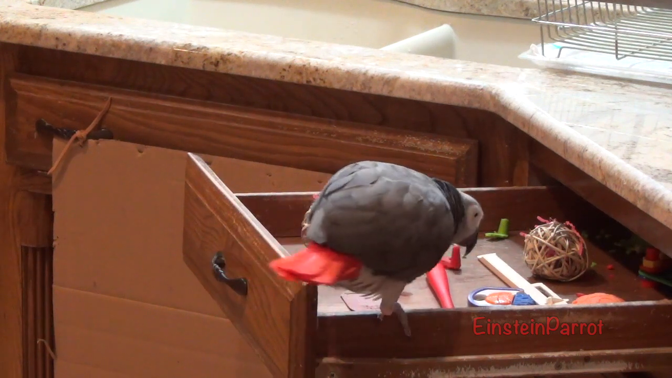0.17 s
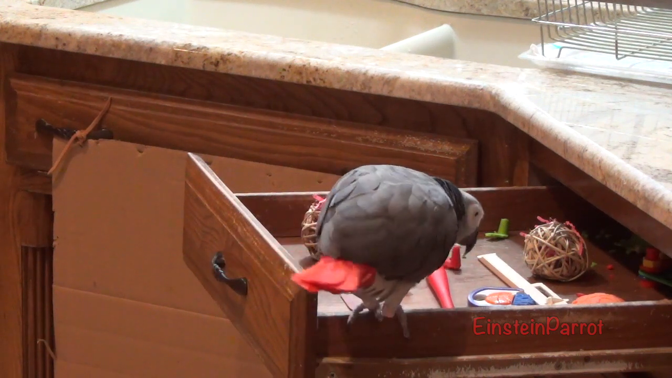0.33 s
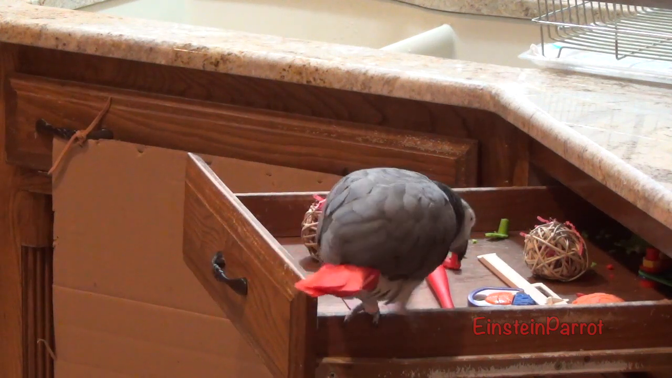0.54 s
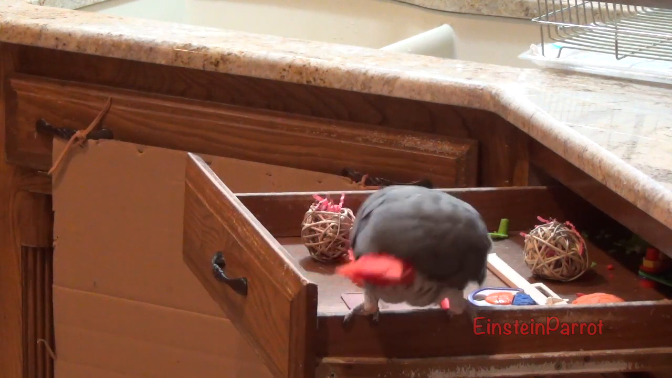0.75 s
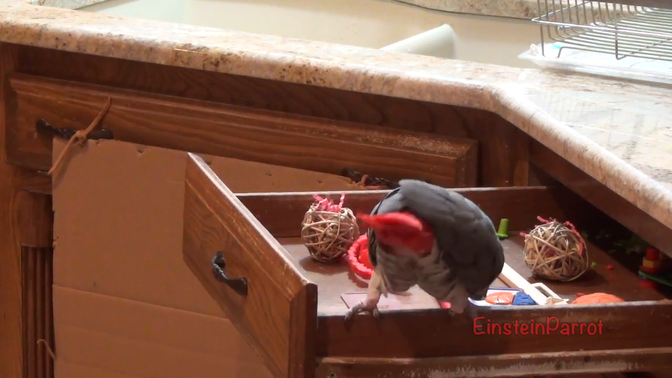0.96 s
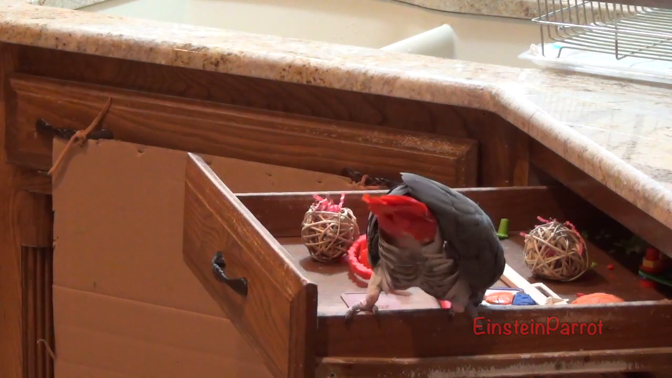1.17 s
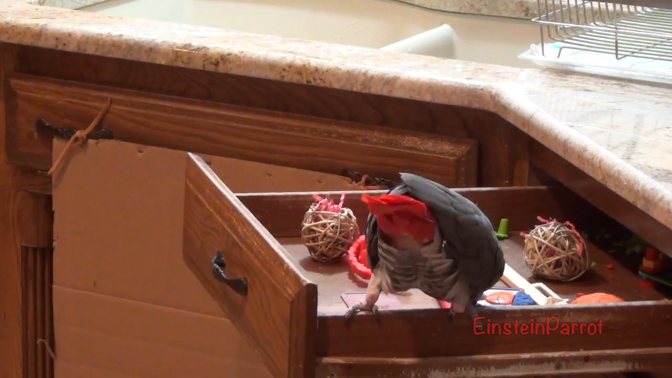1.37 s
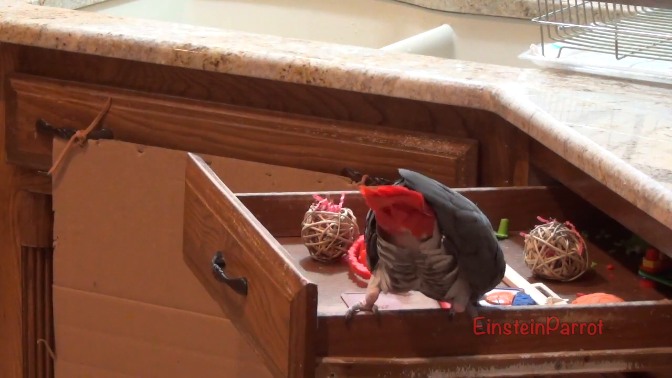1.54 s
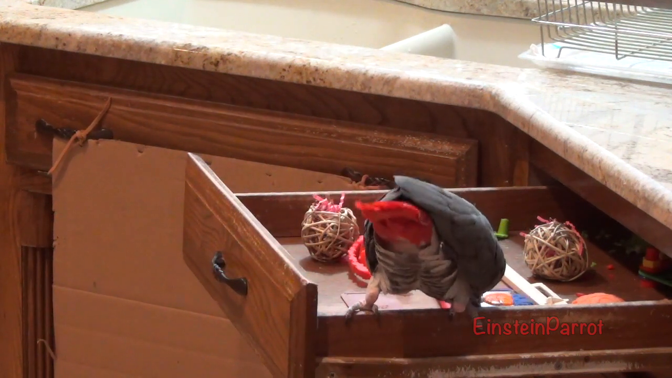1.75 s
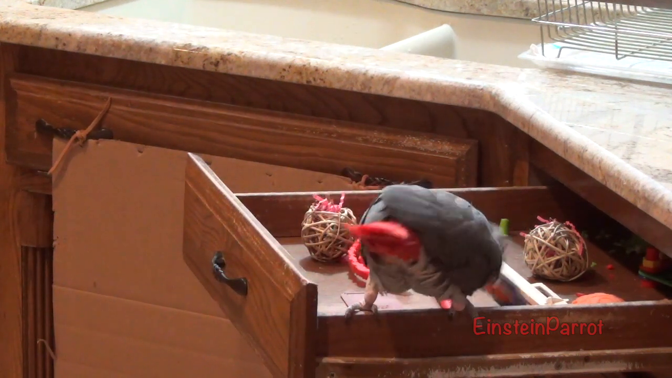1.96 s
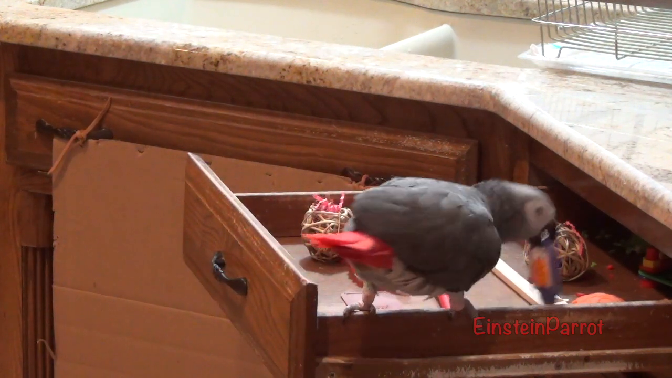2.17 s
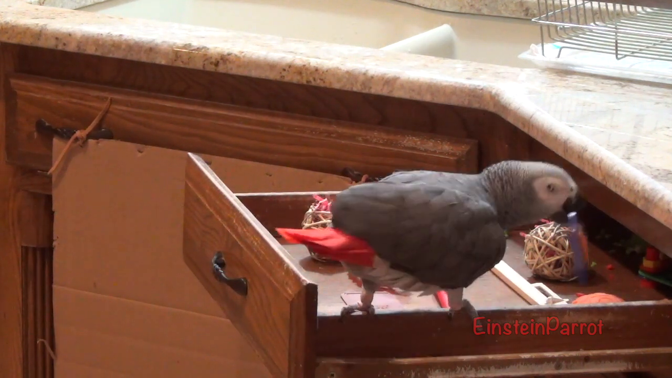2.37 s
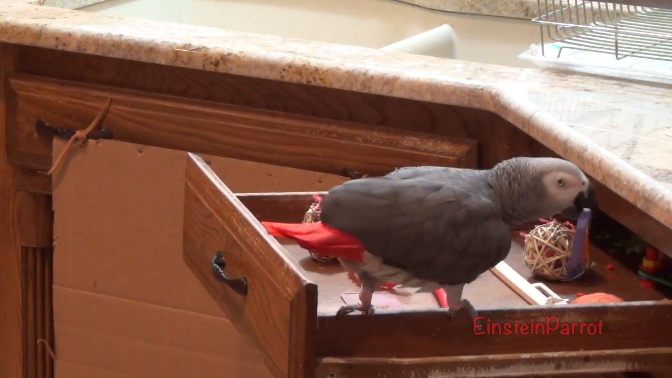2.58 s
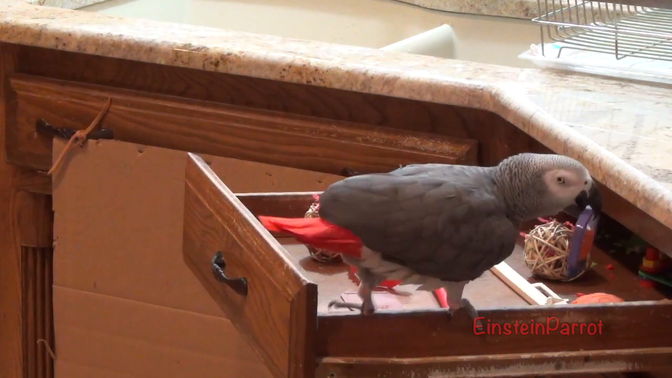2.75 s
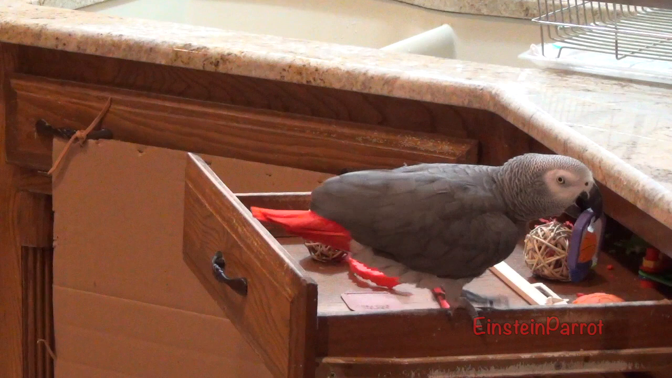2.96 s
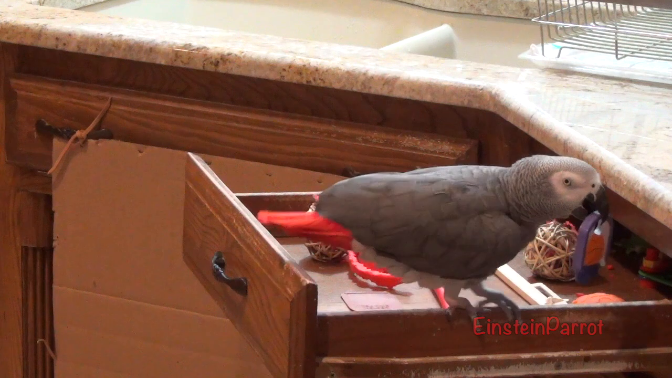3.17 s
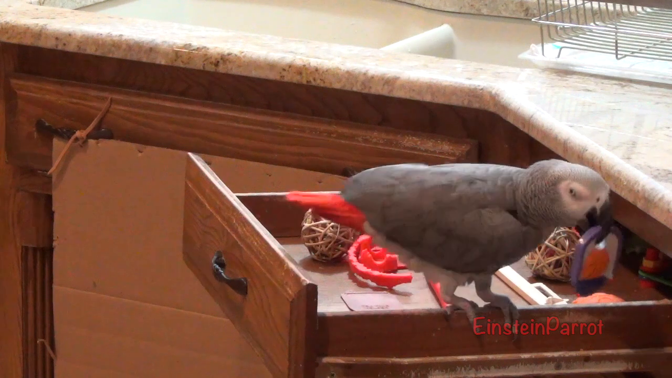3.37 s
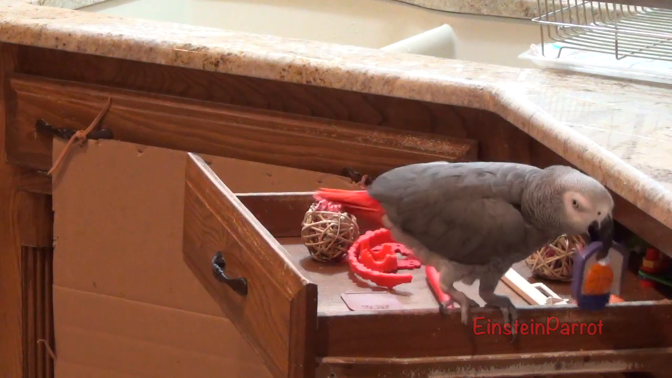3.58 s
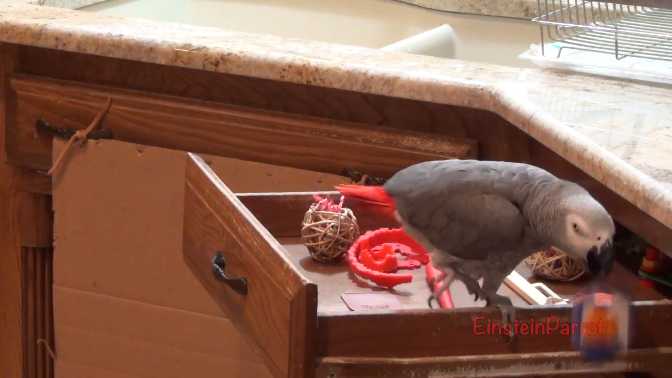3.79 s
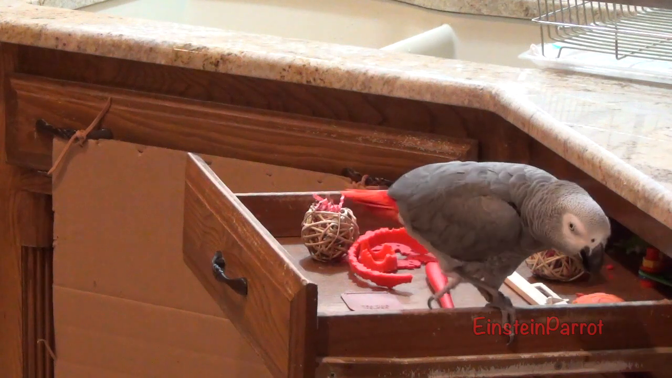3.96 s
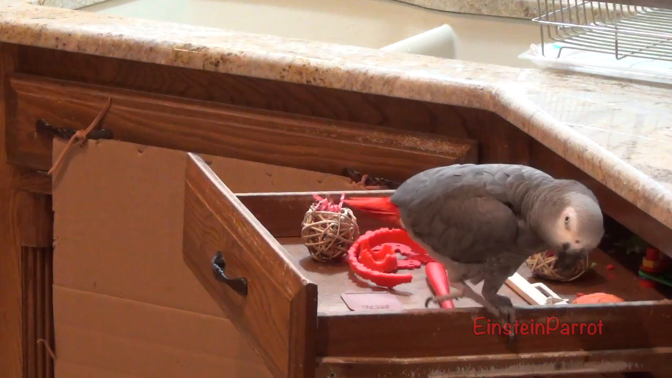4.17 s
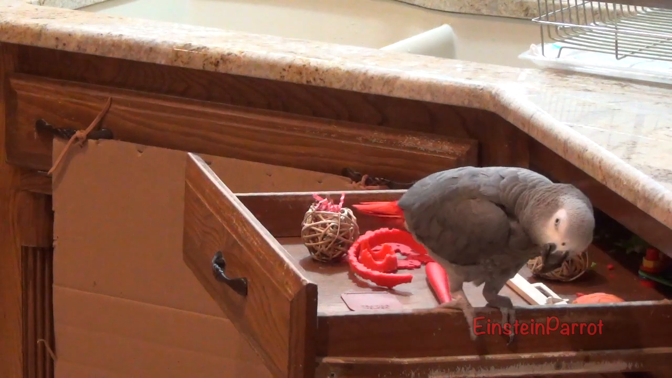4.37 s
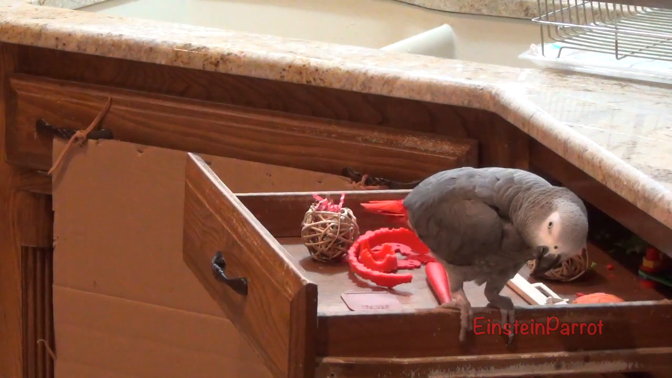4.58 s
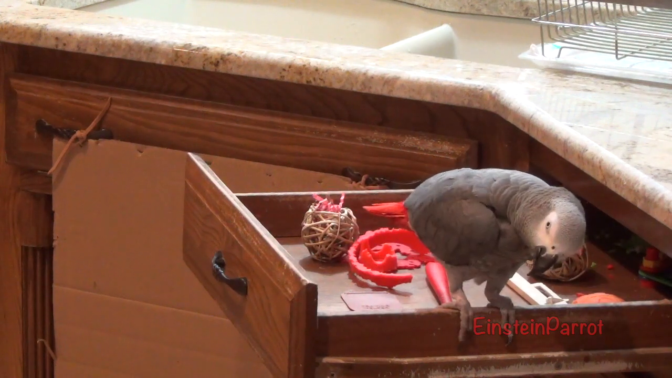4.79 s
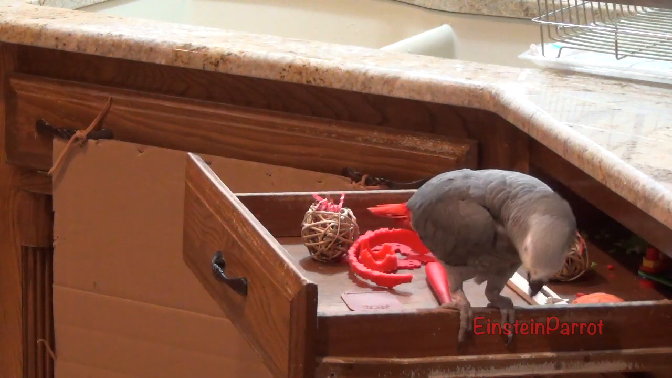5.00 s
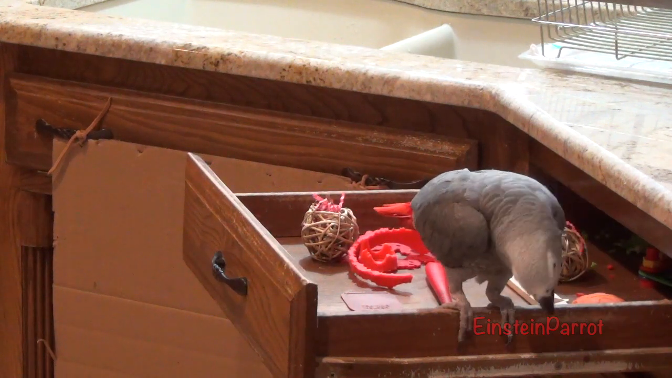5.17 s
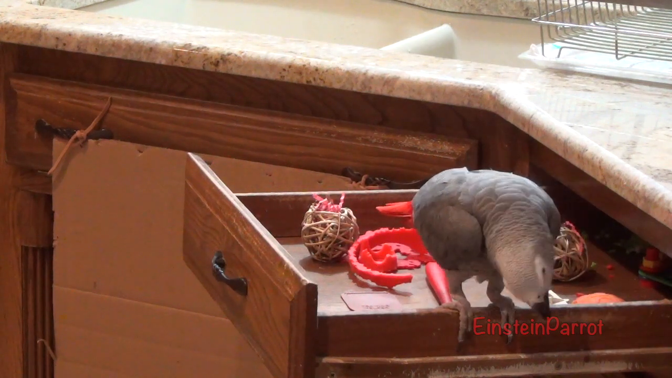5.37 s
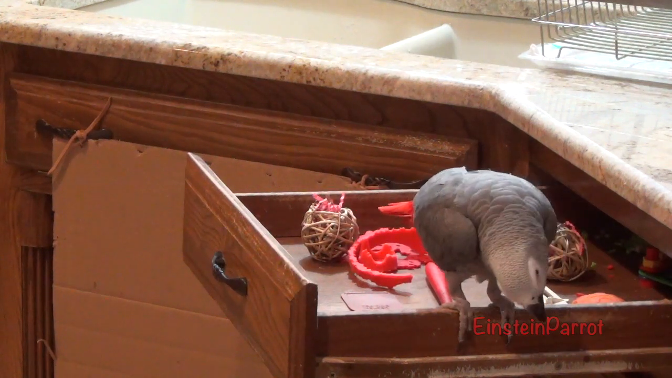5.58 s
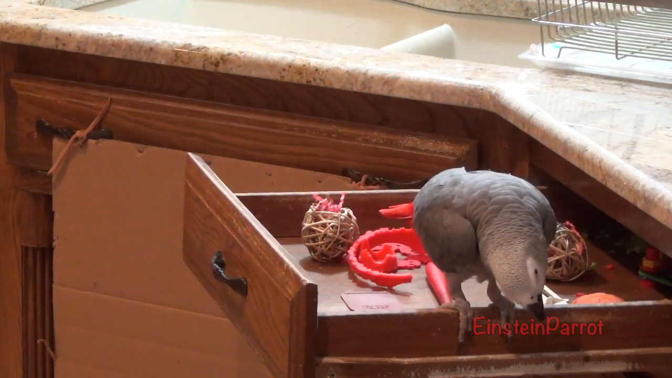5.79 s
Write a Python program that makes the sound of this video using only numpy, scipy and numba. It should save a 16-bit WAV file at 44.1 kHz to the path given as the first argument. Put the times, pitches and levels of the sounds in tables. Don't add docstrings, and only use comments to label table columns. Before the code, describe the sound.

A parrot handles hard toys in an open wooden drawer. Over soft fridge hum and airy ventilation come tiny beak and claw clicks, faint feather rustle, several dull woody knocks and a short scrape. After a quiet pause and a crisp beak click, a plastic toy hits the floor tiles, bouncing and rattling very loudly before settling. The small camera microphone is nearby in a hard, echoing kitchen and squeezes the loudest hits.

```python
import sys
import numpy as np
from scipy import signal
from scipy.fft import rfft, irfft
from scipy.io import wavfile
from numba import njit

SR = 44100
rng = np.random.default_rng(int(sys.argv[2]) if len(sys.argv) > 2 else 0)


def attenuation_scalar(level_db):
    decades = np.asarray(level_db, float) / 20
    return 10 ** decades


def store_pcm(level_fs):
    pcm = np.round(np.clip(level_fs, -1, 1) * 32767).astype(np.int16)
    wavfile.write(sys.argv[1], SR, np.atleast_2d(pcm).T)


N = 257544
T = np.arange(N) / SR

# time in seconds, peak in dB, softness, face share and room share in dB.
CLICKS = [(0.0144, -52.5, 4, 4.5, 3), (0.1605, -47, 1.5, -3.5, 1), (0.18, -45, 1, 2.0, -2.5),
          (0.5085, -34, -2, 7, -17.0), (0.5125, -26, -4, 2.5, -3.0), (0.7175, -38.0, -0.5, 5, -4.5),
          (1.949, -44, 2.0, -2, 3.5), (1.993, -49, 11.0, -9.0, -1), (2.047, -46, -9, -1, 2.0),
          (2.52, -57.5, 3, -5, 5), (2.66, -57.5, 1.0, 7.5, 5), (2.746, -48.5, 1, 4.5, 0.5)]
FIRST_BITE = [
    (3.2485, -32.5, 0, 0.5, -2),
]
LAST_BITE = [
    (3.5564, -22.5, 0, 0, 0),
]
KNOCKS = [
    (1.195, -30, -10, -4, -4.5),
    (1.433, -29.5, -5, 4, -8),
    (1.582, -34.5, 8, -2, -7),
    (1.603, -29.5, 4, -2.5, -7.5),
    (1.687, -27, -1.5, 6.5, -4.5),
]
# start in seconds, level in dB, hold in seconds.
DRAG = [
    (1.72, -42.5, 0.086),
    (1.84, -51.5, .012),
]
BOUNCES = [
    (4.1925, -32, 12, 10, -15.0),
    (4.1988, -11, -4.5, -8, 9.5),
    (4.2582, -6, 0.0, -7, 2.5),
    (4.4998, 1.5, -4, 4, 4.5),
    (4.6309, -9.0, -3, 5, -1.5),
    (4.6611, -11.5, 1.5, 2.5, 3.0),
    (4.7498, -13, 3.5, -8.5, 0.5),
]
SNAPS = [(4.3324, -10, -1, -8, -22.0), (4.4432, -11.5, 5, 0, -21), (4.479, -12, -5, 2, -6.5),
         (4.4836, -11, 0.5, -1, 3.5), (4.5104, 0.5, 11, -1, -13.5), (4.5354, 2, 4, 2, -19),
         (4.6204, -4.5, -3.5, 1, -12), (4.6254, -4, 8.5, -4.0, -13.0), (4.7204, -12, -2.5, -8, -15.5),
         (4.7615, -6.5, -3.5, 0, -20), (4.793, -8.5, -1.5, 9, -5), (5.048, -15.5, -0.5, 11, -3.5)]
ROCKS = [
    (3.645, -37, 8, -2.5, -4),
    (4.4454, -7.5, 1, -7.0, -3),
    (4.8178, -3.5, -5, -6, 1.5),
    (4.9379, -5, -4, -2.5, -1),
    (4.9551, -5.5, -2, -4, 0.0),
    (4.9722, -14.5, -12, 17, -19),
    (5.0607, -6.5, -6.5, 1, 3),
    (5.445, -42.0, 2.5, 4, -5.5),
    (5.7005, -47, 6, -2.5, 2.5),
    (5.8235, -31.5, -1, 5.0, -1),
]
# start in seconds, level in dB, hold in seconds, face share in dB.
RATTLE = [
    (4.209, -7, 0.011, 3.5),
    (4.235, -20.5, .03, 7),
    (4.512, -16.5, .055, -5),
    (4.62, -36, .09, -4.5),
]
# time in seconds, peak in dB, length in
# milliseconds.
THUMPS = [
    (4.263, -40, 1.2),
    (4.501, -25.5, 0.66),
]
# start in seconds, level in dB, hold in seconds.
RUSTLE = [(.02, -58, 0.013), (.178, -59, 0.0076), (.42, -67.5, 0.022), (.6, -51, 0.053), (.76, -61, .01),
          (1.005, -65, .01), (1.62, -64, .06), (1.71, -49.5, 0.2), (2.058, -55.5, 0.007), (2.2, -72, 0.081),
          (2.544, -67, .02), (2.752, -56, .01), (3.088, -61, 0.27), (3.77, -57.5, 0.075)]

# frequency in Hz, width in Hz, level in dB.
SMALL_TOYS = [(1600, 490, -6.5), (2350, 590, -6.5), (3500, 1000, -5), (4800, 1100, -6), (5870, 560, -2),
              (6240, 110, -5.5), (6830, 690, -2.5), (7900, 1000, 1.5), (9200, 1200, -2.5), (10550, 990, -6)]
FIRST_GRIP = [(1280, 280, -1.5), (2300, 780, 1.5), (3080, 710, -1.5), (3680, 270, -3.5), (4700, 610, 5),
              (5900, 560, 0.5), (6900, 240, -2), (7540, 500, 0), (8300, 420, 1), (9300, 500, -3),
              (10500, 720, 3.5)]
SECOND_GRIP = [(1640, 760, -8), (2300, 1500, 0.5), (4150, 750, 0.5), (4750, 350, -2), (5670, 300, -11),
               (6180, 360, -3.5), (6820, 440, -5.5), (7960, 1300, -1), (8900, 750, -2.5),
               (10600, 1400, -1.5)]
BOTTOM_NEAR = [(181, 100, 1.5), (398, 190, 7), (510, 320, 2.5), (844, 150, 2), (1040, 330, 0),
               (1380, 480, -3.5), (1810, 730, -13), (2070, 180, -4.5), (2260, 280, -6.5), (2720, 240, -4),
               (2980, 440, -3.5), (4180, 900, -4), (5870, 3000, 6)]
BOTTOM_FAR = [(168, 61, -7), (333, 56, 6), (480, 110, -0.5), (827, 230, 1), (964, 240, 3.5),
              (1380, 600, -1.5), (1790, 500, -12), (2060, 190, -1), (2300, 220, -3.5), (2650, 250, 0),
              (2950, 400, -2.5), (4050, 3100, -3), (5900, 4100, 5)]
WOOD = [(174, 60, -7.5), (336, 99, 1.5), (432, 36, -2.5), (508, 61, -0.5), (626, 160, -0.5), (820, 190, -2),
        (1030, 150, -5.5), (1430, 560, -5.5), (2000, 300, -6), (2370, 150, -6), (2660, 170, -4.5),
        (3020, 650, -8), (3940, 720, -11), (6040, 2700, 5.5)]
PLASTIC = [(415, 380, -26), (970, 630, -12), (1650, 510, -4.5), (2420, 510, -2.5), (3410, 1130, -4),
           (3970, 1500, -1.5), (4470, 710, -3.5), (5500, 1300, -0.5), (6020, 290, -1.5), (6540, 560, 0),
           (7260, 300, -0.5), (7250, 3000, 4.5), (9250, 1400, -5), (10390, 1350, -3)]
TOY_ON_EDGE = [(1103, 860, -12.5), (1674, 400, -2.5), (2473, 540, -1), (3640, 370, 1), (3994, 130, 0.5),
               (4320, 310, -1), (5390, 670, -4.5), (5980, 1300, -1), (6590, 580, -3.5), (7600, 510, 2.5),
               (8680, 680, -3), (9280, 290, -4.5), (10320, 2000, -3)]
RACK = [(1660, 95, -46), (2520, 150, -58.5), (4080, 150, -46), (5270, 89, -50.5)]
FRIDGE = [(121.7, 13.5, -62.5), (65, 22, -65.5), (842, 120, -65.5), (1170, 61, -72), (1533, 62, -76.5),
          (1016, 140, -74), (6290, 1700, -72.5)]

# frequency in Hz, seconds to fall 60 dB, echo level in dB, side minus mid in dB.
KITCHEN = [(254, 0.57, -25, -12.5), (512, 0.47, -23.5, -13), (997, 0.52, -25, -11.5),
           (1760, 0.62, -27, -16.5), (2450, 0.5, -25, -32), (4000, 0.53, -25.5, -45),
           (6620, 0.42, -29.5, -41.5), (10160, 0.35, -28, -13.5)]
# frequency in Hz, level in dB.
AIR = [(15, -68), (25, -29), (114, -3.5), (440, -10), (1330, -20), (10600, -27.5), (11500, -31.5),
       (15000, -73)]
# frequency in Hz, side minus mid in dB.
AIR_SIDE = [(60, -22), (110, -12.5), (350, -16.5), (630, -9.5), (1120, 0), (2020, -15.5), (3630, -26),
            (11700, -6)]

PLASTIC_EDGES = (3000, 5000, 7200)
WOOD_EDGES = (600, 1600, 4500)
PLASTIC_SOFT = (1, .4, 0, -.8)
WOOD_SOFT = (0, 0, -.6, -1)
PLASTIC_FACE, WOOD_FACE = 1, 0
# one level in dB per register, low to high.
CLICK_DB = (-5.6, -6, 0, -12.5)
FIRST_BITE_DB = (-14.5, -11, 0.5, -6)
LAST_BITE_DB = (-14, -12, 0, -10)
KNOCK_DB = (-1.3, 0, -4.5, -16.5)
DRAG_DB = (0, -2, -12, -14)
LANDING_DB = (-8, -4.5, 0, -6.5)
SNAP_DB = (-22, -10, -1, -6.5)
ROCK_DB = (-10, -7, 0, -13.5)
RATTLE_DB = (-5, 0.5, 10, -2)

AIR_DB, RACK_T60_S = -55.5, 1.68
EARLY_S, EARLY_DB = 0.0072, 2
PATCHY_DB = 2
CEILING_DB, ATTACK_S, RELEASE_S, RATIO = -10, 0.00038, 0.027, 3.4
CLIP = 0.85


def band(x, hz, width):
    return signal.lfilter(*signal.iirpeak(hz, hz / width, fs=SR), x)


def unit(x):
    return x / np.sqrt(np.mean(x ** 2))


def along(hz, table, column=1):
    rows = np.array(table, float)
    return np.interp(np.log(np.maximum(hz, 1)), np.log(rows[:, 0]), rows[:, column])


def colour(x, db_at):
    hz = np.arange(len(x) // 2 + 1) * SR / len(x)
    return irfft(rfft(x) * attenuation_scalar(db_at(hz)), len(x))


def grains(rate, scatter_db, size=N):
    out = np.zeros(size)
    count = int(size * rate / SR) + 1
    places = rng.integers(size, size=count)
    signs = rng.choice([-1, 1], count)
    out[places] = signs * attenuation_scalar(scatter_db * rng.exponential(size=count))
    return unit(out)


def fading(power, seconds):
    return signal.lfilter([1], [1, -np.exp(-1 / (seconds * SR))], power)


def walk(rate, size):
    steps = rng.standard_normal(int(size * rate / SR) + 2)
    return np.interp(np.arange(size) * rate / SR, np.arange(len(steps)), steps)


def swells(rows, rise_db_s, fall_db_s):
    rows = np.array(rows, float)[:, :3, None]
    start, level_db, hold = rows[:, 0], rows[:, 1], rows[:, 2]
    down_db = rise_db_s * np.maximum(start - T, 0)
    down_db = down_db + fall_db_s * np.maximum(T - start - hold, 0)
    return attenuation_scalar(level_db - down_db) * (down_db < 40)


def blows(events, gain_db, contact_ms, colour_db, soft=PLASTIC_SOFT, face=PLASTIC_FACE,
          tick=0.97, rise_ms=0, size=1024):
    force, power = np.zeros((2, 4, N + size))
    fade = np.exp(-np.arange(size) / (contact_ms * SR / 1000))
    chatter = rng.standard_normal((len(events), size)) * fade * 0.3
    chatter[:, 0] = tick
    spectrum = rfft(chatter, axis=1)
    chatter = irfft(spectrum / np.abs(spectrum), size, axis=1)
    chatter *= np.minimum((np.arange(size) + 1) / (1 + rise_ms * SR / 1000), 1)
    for (s, db, soft_db, face_db, room_db), shape in zip(events, chatter):
        register_db = np.array(colour_db) + soft_db * np.array(soft) + face_db * (np.arange(4) == face)
        push = attenuation_scalar(gain_db + db + register_db)[:, None] * shape
        at = int(s * SR)
        force[:, at:at + size] += push
        power[:, at:at + size] += (attenuation_scalar(room_db) * push) ** 2
    return np.array([force, power])[..., :N]


def body(drive, modes, edges, build_s=0.0024):
    out = np.zeros((2, N))
    active = np.flatnonzero(drive[0, 0])
    span = slice(active[0], min(active[-1] + SR * 3 // 4, N))
    force, power = drive[..., span]
    size = force.shape[1]
    build = fading(power, build_s)
    early = attenuation_scalar(2 * EARLY_DB) * (fading(power, EARLY_S) - build) - build
    for k, (hz, width, db) in enumerate(modes):
        register = np.searchsorted(edges, hz)
        late = fading(power[register], along(hz, KITCHEN) / np.log(1e6)) + early[register]
        late = attenuation_scalar(PATCHY_DB * walk(34.95, size=size)) * np.sqrt(np.maximum(late, 0))
        echoes = np.array([grains(5000, 2.18, size=size), rng.standard_normal(size)])
        echoes *= late * attenuation_scalar(along(hz, KITCHEN, column=2))
        echoes[0] += (-1) ** k * force[register]
        echoes[1] *= attenuation_scalar(along(hz, KITCHEN, column=3))
        ring = band(band(echoes, hz, width), hz, width)
        out[:, span] += attenuation_scalar(db) * np.sqrt(1500 / width) * ring
    return out


def room_tone():
    mid = unit(colour(rng.standard_normal(N), lambda hz: along(hz, AIR))) * attenuation_scalar(AIR_DB - 2.5)
    side = colour(rng.standard_normal(N), lambda hz: along(hz, AIR) + along(hz, AIR_SIDE))
    side *= attenuation_scalar(-10.0) * np.std(mid) / np.std(side)
    hum = np.zeros(N)
    for hz, width, db in FRIDGE:
        hum += attenuation_scalar(db) * unit(band(band(rng.standard_normal(N), hz, width), hz, width))
    return np.array([mid + hum, side])


def beak_and_claws():
    clicks = blows(CLICKS, gain_db=27.5, contact_ms=3.6, colour_db=CLICK_DB, tick=0.33, rise_ms=0.8)
    first = blows(FIRST_BITE, gain_db=26.5, contact_ms=4.5, colour_db=FIRST_BITE_DB, tick=0.7)
    last = blows(LAST_BITE, gain_db=26.5, contact_ms=3.6, colour_db=LAST_BITE_DB, tick=0.58)
    return (body(clicks, SMALL_TOYS, PLASTIC_EDGES)
            + body(first, FIRST_GRIP, PLASTIC_EDGES)
            + body(last, SECOND_GRIP, PLASTIC_EDGES))


def rustle():
    fine = grains(3000, 2.3)
    hiss = unit(band(fine, 5780, 1200)) + attenuation_scalar(-9) * unit(band(fine, 4200, 500))
    stirring = swells(RUSTLE, rise_db_s=291, fall_db_s=113).sum(axis=0)
    return hiss * stirring * attenuation_scalar(-4.5)


def knock(rows):
    return blows(rows, gain_db=26, contact_ms=8.1, colour_db=KNOCK_DB, soft=WOOD_SOFT, face=WOOD_FACE,
                 tick=0.27, rise_ms=3.9)


def drawer():
    drag = swells(DRAG, rise_db_s=900, fall_db_s=320).sum(axis=0)
    slips = attenuation_scalar(4.5) * grains(590, 2.5) * drag * attenuation_scalar(np.array(DRAG_DB))[:, None]
    return (body(knock(KNOCKS[:1]), BOTTOM_NEAR, WOOD_EDGES)
            + body(knock(KNOCKS[1:2]), BOTTOM_FAR, WOOD_EDGES)
            + body(knock(KNOCKS[2:]) + np.array([slips, slips ** 2]), WOOD, WOOD_EDGES))


def dropped_toy():
    shaken = swells(RATTLE, rise_db_s=5000, fall_db_s=379)
    face_db = np.outer(np.arange(4) == PLASTIC_FACE, np.array(RATTLE)[:, 3])
    share = attenuation_scalar(face_db + np.array(RATTLE_DB)[:, None])
    chatter = attenuation_scalar(-6.5) * grains(1200, 3.8) * (share @ shaken)
    landings = blows(BOUNCES, gain_db=24, contact_ms=2.2, colour_db=LANDING_DB)
    snaps = blows(SNAPS, gain_db=22.5, contact_ms=0.4, colour_db=SNAP_DB)
    rocking = blows(ROCKS, gain_db=26.5, contact_ms=4.1, colour_db=ROCK_DB)
    crash = landings + snaps + np.array([chatter, chatter ** 2])
    return body(crash, PLASTIC, PLASTIC_EDGES) + body(rocking, TOY_ON_EDGE, PLASTIC_EDGES)


def rack():
    shaken = np.zeros(N)
    rows = np.array(ROCKS)
    shaken[(rows[:, 0] * SR).astype(int)] = attenuation_scalar(2 * rows[:, 1])
    ring = np.sqrt(fading(shaken, RACK_T60_S / np.log(1e6)))
    wires = sum(attenuation_scalar(db) * unit(band(rng.standard_normal(N), hz, width)) for hz, width, db in RACK)
    return ring * wires


def thumps():
    return sum(attenuation_scalar(db) * np.exp(-((T - s) * 1000 / ms) ** 2) for s, db, ms in THUMPS)


def scene():
    mid, side = room_tone() + beak_and_claws() + drawer() + dropped_toy()
    mid = mid + rustle() + rack()
    side = side + 0.17 * signal.lfilter(*signal.butter(1, 1500, fs=SR), mid)
    return np.array([mid + side, mid - side])


@njit
def follow(x, attack, release):
    y, e = np.empty(len(x)), 1e-9
    for i in range(len(x)):
        e += (x[i] - e) * (attack if x[i] > e else release)
        y[i] = e + 1e-9
    return y


def top_cut(x):
    return signal.sosfilt(signal.butter(12, 12330, fs=SR, output="sos"), x)


def record(dry):
    x = dry - 0.33 * band(dry, 4990, 1180)
    peak = follow(np.abs(x).max(axis=0), 1 / (ATTACK_S * SR), 1 / (RELEASE_S * SR))
    x = x * np.minimum(1, attenuation_scalar(CEILING_DB) / peak) ** (1 - 1 / RATIO)
    x = x + attenuation_scalar(np.array([[1.5], [-1.5]])) * thumps()
    x = CLIP * np.tanh(x / CLIP)
    x = signal.sosfilt(signal.ellip(10, 0.2, 60, 11000, fs=SR, output="sos"), x)
    x = x - 0.15 * x ** 3
    return top_cut(x)


dry = scene()
out = record(dry)
store_pcm(out)
```